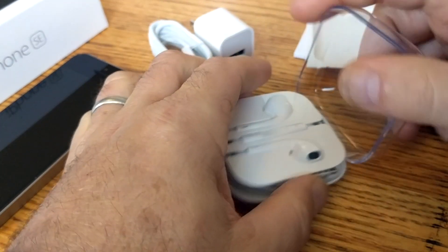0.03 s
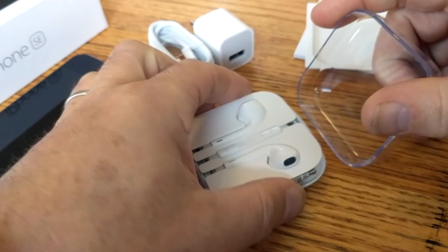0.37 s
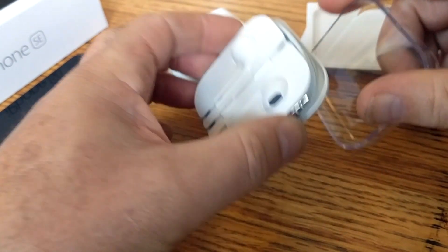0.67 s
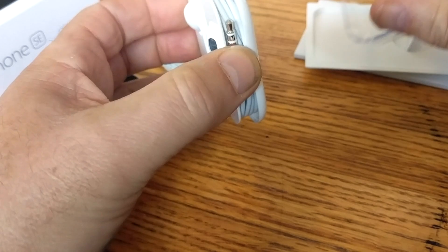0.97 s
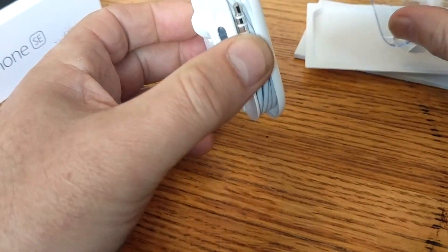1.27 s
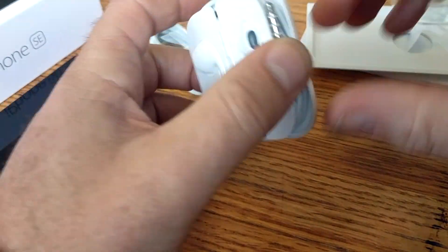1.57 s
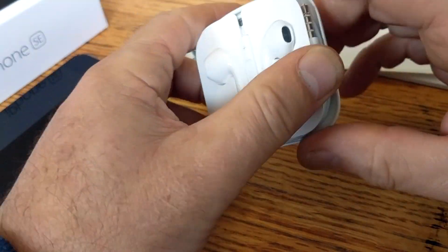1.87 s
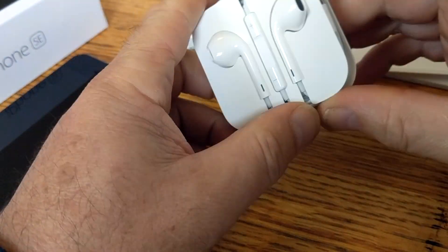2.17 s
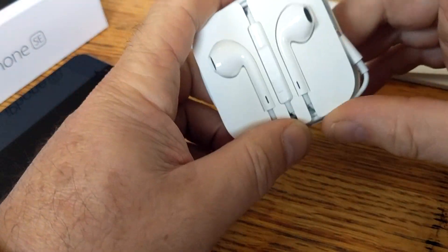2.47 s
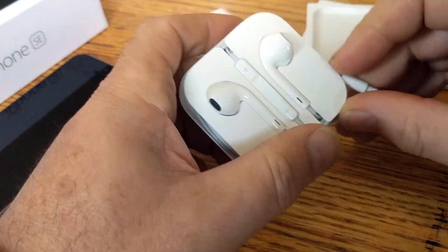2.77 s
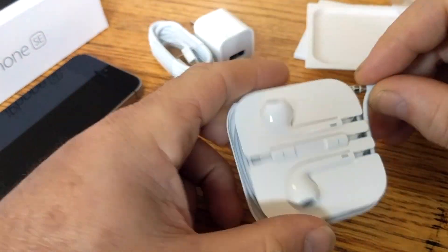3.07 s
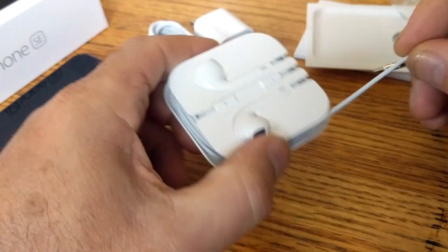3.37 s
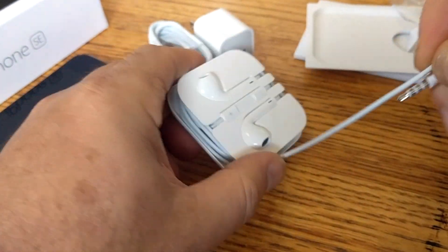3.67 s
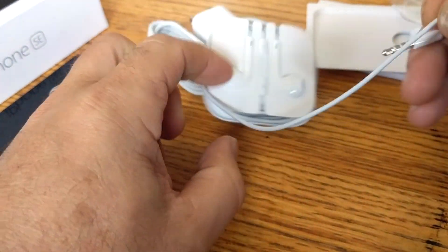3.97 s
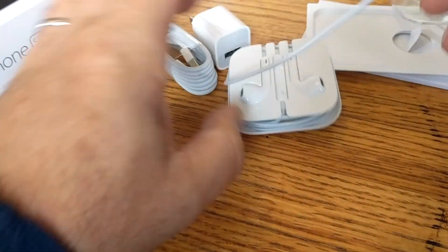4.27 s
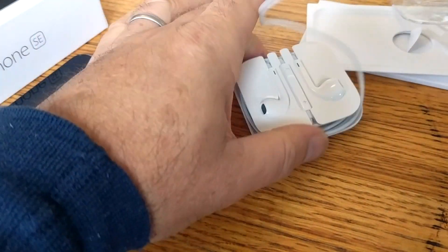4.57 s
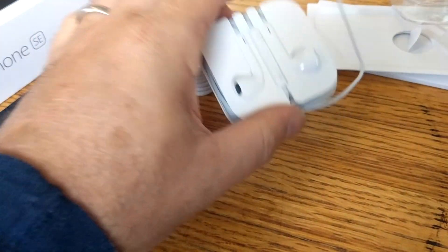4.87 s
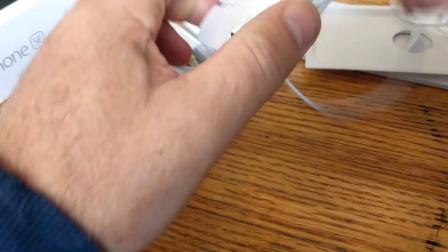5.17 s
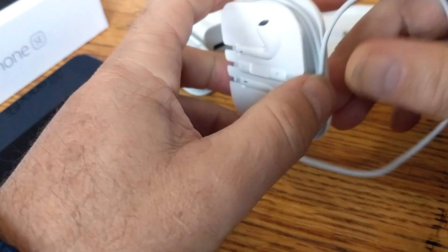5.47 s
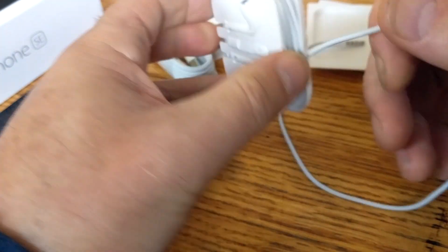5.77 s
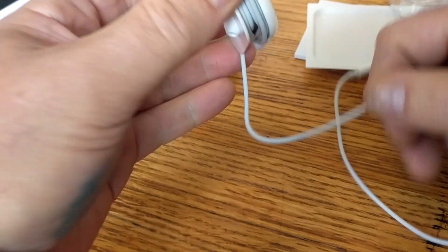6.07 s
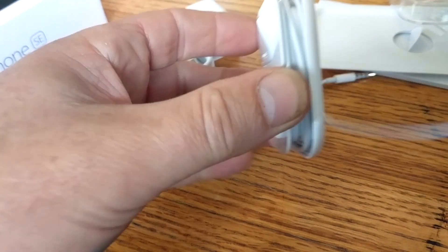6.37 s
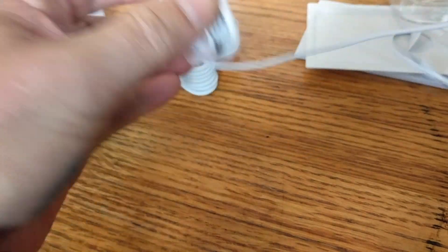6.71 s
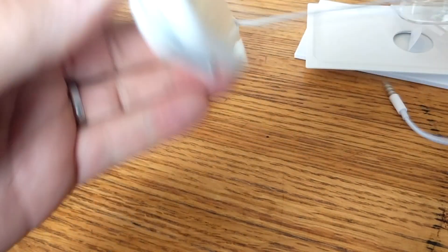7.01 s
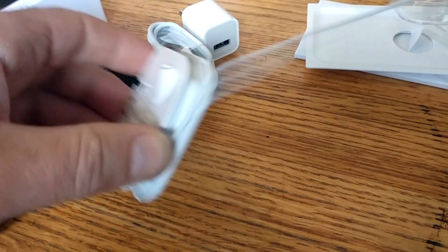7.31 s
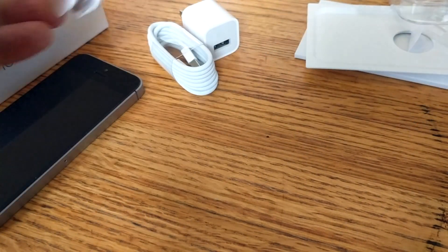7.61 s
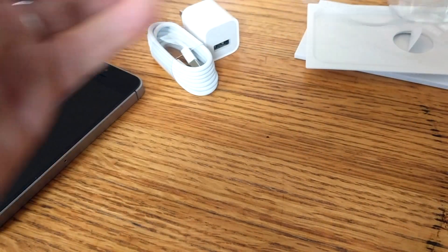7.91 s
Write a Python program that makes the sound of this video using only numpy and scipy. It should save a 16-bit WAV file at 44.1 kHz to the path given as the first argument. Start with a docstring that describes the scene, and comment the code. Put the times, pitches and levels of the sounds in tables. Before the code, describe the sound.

Close plastic taps and clicks, a clatter on wood and a sharp snap, then a cord unwinding from a creaking holder.

```python
"""A hard plastic earphone case is unpacked close up on a wooden table, over a small room's low hum.
First the clear lid is set aside with a few taps, and fingers rub and tick along the holder's rim.
Around 4 s the holder clatters on the table and the wood booms; at 5 s its catch snaps free, the loudest
sound, and a limiter ducks briefly. Then the cord rubs and ticks as it is unwound from the creaking
holder, until a last snap and a bright swish near 7.7 s."""
import sys
import numpy as np
from scipy import signal
from scipy.fft import rfft, irfft
from scipy.io import wavfile
from scipy.ndimage import uniform_filter1d, minimum_filter1d

SR = 44100
rng = np.random.default_rng(int(sys.argv[2]) if len(sys.argv) > 2 else 0)


def pcm_store(signal):
    """Save signal as 16-bit PCM."""
    levels = np.round(np.clip(np.atleast_2d(signal), -1, 1) * 32767)
    wavfile.write(sys.argv[1], SR, levels.astype(np.int16).T)


N = 355005
CONTACT_S, TOP_CUT_HZ = .01, 16200   # span over which a contact's level is set; top of the spectrum


def from_db(db):
    """Decibels to gain."""
    return 10 ** (np.asarray(db) / 20)


def rms_one(x):
    """Scale to rms 1."""
    return x / np.sqrt(np.mean(x ** 2) + 1e-20)


def band(x, low_hz, high_hz, order=2):
    """Causal band-pass."""
    sos = signal.butter(order, [low_hz, min(high_hz, .45 * SR)], "band", fs=SR, output="sos")
    return signal.sosfilt(sos, x)


def soften(x, corner_hz):
    """One-pole low-pass: contacts are never perfectly hard."""
    return signal.sosfilt(signal.butter(1, min(corner_hz, .45 * SR), fs=SR, output="sos"), x)


def seconds(length_s):
    """Time axis of a given length."""
    return np.arange(int(length_s * SR)) / SR


def add(track, start_s, sound):
    """Mix a sound into the track."""
    at = int(start_s * SR)
    track[at:at + len(sound)] += sound[:max(N - at, 0)]


def ringing(modes, length_s, spread_db, detune):
    """Decaying modes; every blow lands elsewhere and shares its force out differently."""
    t = seconds(length_s)
    hz, db, t60 = np.transpose(modes)[:, :, None]
    strength = from_db(db + spread_db * rng.standard_normal(hz.shape)) * rng.choice([-1, 1], hz.shape)
    grip = 1 + detune * rng.standard_normal(hz.shape)   # the hands detune the part a little
    return np.sum(strength * from_db(-60 * t / t60) * np.sin(2 * np.pi * hz * grip * t), axis=0)


def click_response(modes, crack_db, detune=.03):
    """A part's answer to one click: its main modes plus a noisy crack for the many short-lived ones."""
    ring = rms_one(ringing(modes, length_s=.1, spread_db=0.0, detune=detune))
    t = np.arange(len(ring)) / SR
    crack = rng.standard_normal(len(t)) * np.exp(-t / 0.00074)
    return ring + from_db(crack_db) * rms_one(crack)


def slips(size, per_s, spread_db):
    """Stick-slip friction: tiny clicks of uneven size at random moments."""
    sizes = from_db(spread_db * np.minimum(rng.exponential(1, size), 4)) * rng.choice([-1, 1], size)
    return sizes * (rng.random(size) < per_s / SR)


def colour(brightness_db, body_db, edge_db, edge_follows):
    """Body, mid, edge and sheen in dB against the mids: a harder touch gains treble and loses body."""
    return body_db - 0.058 * brightness_db, 0, edge_db + edge_follows * brightness_db, brightness_db


# Borders of the body, mid, edge and sheen bands: f/Hz
EQ_EDGES = [560, 1100, 2400, 5000, 16000]


def voiced(x, level_db, colour_db, length_s):
    """Four-band EQ: set each band to level plus colour, as rms over length_s."""
    out = 0
    for low_hz, high_hz, db in zip(EQ_EDGES, EQ_EDGES[1:], colour_db):
        part = band(x, low_hz, high_hz, order=3)
        out = out + part * from_db(level_db + db) * np.sqrt(length_s * SR / (np.sum(part ** 2) + 1e-20))
    return out


def contacts(cues, modes, crack_db, chatter_db, stretch, build_up, corner_hz,
             gain_db, body_db, edge_db, edge_follows, detune):
    """Each contact is a click within a brief chatter of the two surfaces, ringing through the part."""
    out, click_at = np.zeros(N), int(CONTACT_S / 2 * SR)
    t_ms = 1000 * (seconds(CONTACT_S * 2) - click_at / SR)
    for start_s, level_db, brightness_db, length_ms in cues:
        rise_ms = build_up * length_ms   # a sliding contact creeps before it lets go
        envelope = np.exp(np.minimum(t_ms / rise_ms, -t_ms / (stretch * length_ms)))
        force = slips(len(t_ms), per_s=9000, spread_db=2.0) * envelope
        # the longer the contact, the more chatter against the click
        force *= from_db(chatter_db) * length_ms / np.sqrt(np.sum(force ** 2) + 1e-12)
        force[click_at] += 1
        hit = soften(np.convolve(force, click_response(modes, crack_db, detune)), corner_hz)
        colour_db = colour(brightness_db, body_db, edge_db, edge_follows)
        hit = voiced(hit, level_db + gain_db, colour_db, CONTACT_S)
        add(out, start_s + (rise_ms + t_ms[0]) / 1000, hit)
    return out


# Spectral shape of the room tone: f/Hz, relative level/dB
AIR_SPECTRUM = [(50, -17.5), (85, -9), (108, -7), (187, -13), (303, -10.5), (394, -18), (947, -26),
                (1100, -26.5), (1750, -26.5), (1910, -30), (3450, -26), (5350, -35.5), (10300, -35.5),
                (16000, -37)]


def background(air_db, hum_hz, hum_db, waver):
    """The bed: soft room tone and a low hum, made slightly unsteady by a narrow rumble."""
    hz, db = np.transpose(AIR_SPECTRUM)
    bins_hz = np.maximum(np.arange(N // 2 + 1) * SR / N, 1)
    shape = from_db(np.interp(np.log(bins_hz), np.log(hz), db))
    air = irfft(rfft(rng.standard_normal(N)) * shape, N)
    hum = np.sqrt(2) * np.sin(2 * np.pi * hum_hz * np.arange(N) / SR)
    rumble = rms_one(band(rng.standard_normal(N), low_hz=48, high_hz=63))
    return from_db(air_db) * rms_one(air) + from_db(hum_db) * (hum + waver * rumble)


# Reverb tail of the small room: f/Hz, relative level/dB, t60/s
REVERB_BANDS = [(200, -3.5, 0.45), (700, -4.5, 0.29), (1480, -8, 0.33), (3000, -13.5, 0.48),
                (6280, -10, 0.25), (14000, -11, 0.24)]


def room_reverb(x, first_echo_s, wet_db):
    """Diffuse reflections, each half octave dying at its own rate."""
    t, tail = seconds(.5), 0
    hz, db, t60 = np.transpose(REVERB_BANDS)
    for low_hz in 100 * 2 ** np.arange(0, 7.5, .5):
        high_hz = low_hz * np.sqrt(2)
        log_centre = np.log(np.sqrt(low_hz * high_hz))
        gain = from_db(np.interp(log_centre, np.log(hz), db))
        decay = from_db(-60 * t / np.interp(log_centre, np.log(hz), t60)) * (t > first_echo_s)
        noise = band(rng.standard_normal(len(t)), low_hz, high_hz)
        tail = tail + gain * noise * decay / np.sqrt(np.sum(decay ** 2))
    return from_db(wet_db) * signal.fftconvolve(x, tail)[:N]


def near_echoes(x, decay_s, wet_db):
    """The hands, boxes and table top scatter the sound back within a few hundredths of a second."""
    t = seconds(.08)
    echoes = rng.standard_normal(len(t)) * np.exp(-t / decay_s) * (t > .003)
    echoes /= np.sqrt(np.sum(echoes ** 2))
    return from_db(wet_db) * soften(signal.fftconvolve(x, echoes)[:N], corner_hz=5030)


# Ring of the holder's rim: f/Hz, relative level/dB, t60/s
RIM_RING = [(1562, 6, 0.022), (1800, 12, 0.012), (2330, -3.5, 0.0078), (3326, -5, 0.014), (4560, -1, 0.016),
            (6340, -29.5, 0.0055), (6590, -1.5, 0.013), (7740, -5, 0.021), (9630, -24, .008),
            (13500, -10, .008)]
# Ticks on the rim: t/s, mid level/dB before gain, brightness/dB (sheen over mids), nominal length/ms
TICK_CUES = [(0.462, -51, 0.5, 4.2), (1.647, -62, 9.5, 2.5), (1.808, -59, 3, 1.3), (2.015, -55, 18, 2.8),
             (2.0235, -60, 24.5, 1.3), (2.2472, -31, -20, 1.4), (2.25, -39.5, 16, 0.86),
             (2.265, -49.5, 11, 0.79), (2.361, -53, 8.5, 4), (2.4475, -53.5, 5.5, 1.7), (2.554, -48, -1, 7),
             (2.707, -59, 13, 4.7), (2.903, -48, 1, 4.2), (2.939, -49, -2, 2), (3.005, -51, 6.5, 4.7),
             (3.0548, -41.5, -25, 1.66), (3.153, -46, -8, 0.53), (4.5895, -43.5, 4.5, 1.2),
             (4.686, -60.5, 12, 1.4), (5.8675, -52.5, 17, 0.7), (5.8788, -43.5, -2, 2.3),
             (5.9905, -41.5, 12, 0.8), (6.191, -38, -10, 3), (6.2015, -43.5, 12.5, 4.1),
             (6.312, -58.5, 10.5, 0.64), (6.4155, -40.5, -5.5, 1.07), (6.548, -44.5, 3.5, 3.6),
             (6.6215, -33, -2, 2.9), (6.626, -35.5, 0.5, 2.15), (6.813, -47, 6, 1.2),
             (6.8285, -42.5, 9, 1.8), (6.8335, -35, -2, 1.86), (6.9913, -32, -6.5, 3.2),
             (7.035, -47.5, -3.5, 3.2), (7.0895, -32, -1, 1.6), (7.295, -41, 0.5, 2.3),
             (7.301, -53, 10, 1.7), (7.6, -34, 7, 1.85)]


def rim_ticks():
    """Cord and fingernails creep over the rim and slip off with thin ticks."""
    return contacts(TICK_CUES, RIM_RING, crack_db=0.0, chatter_db=-5.0, stretch=0.73, build_up=0.7,
                    corner_hz=7960, gain_db=0.07, body_db=-21.5, edge_db=1.5, edge_follows=0.51,
                    detune=0.012)


# How hard the fingers work the plastic: t/s, level/dB before gain
HANDLING_CURVE = [(0.0, -54), (0.76, -78), (1.32, -61), (1.55, -61.5), (3.76, -68), (4.01, -38),
                  (4.17, -61), (4.87, -68), (5.11, -86), (5.22, -51), (5.4, -61.5), (5.87, -67),
                  (6.08, -56), (6.37, -50.5), (6.59, -53.5), (7.51, -63.5), (7.82, -66), (8.05, -52)]


def crinkle(count, spread_db, low_hz, corner_hz, gain_db):
    """Tiny stray ticks of uneven size while the fingers work, from a dozen spots on the rim."""
    out = np.zeros(N)
    spots = [soften(band(click_response(RIM_RING, crack_db=4.0), low_hz, TOP_CUT_HZ), corner_hz)
             for _ in range(12)]
    for moment, faintness, spot in rng.random((count, 3)):
        start_s, tick = moment * N / SR, spots[int(spot * len(spots))]
        peak_db = np.interp(start_s, *np.transpose(HANDLING_CURVE)) + gain_db - spread_db * faintness
        add(out, start_s, from_db(peak_db) * tick / np.abs(tick).max())
    return out


# Finger strokes on plastic: start t/s, end t/s, mid level/dB before gain, brightness/dB
RUB_CUES = [(0.18, 0.293, -55, -1.5), (0.914, 0.985, -60, 0.5), (1.233, 1.313, -53.5, -1),
            (1.879, 1.923, -59.5, 10), (1.952, 2.028, -53, 11), (2.188, 2.243, -58.5, -1),
            (2.235, 2.263, -46, 1), (2.279, 2.374, -62, 2), (2.689, 2.74, -59, -5), (2.877, 3.03, -61.5, 3),
            (3.068, 3.101, -52, -1.5), (3.371, 3.377, -58, 7.5), (3.778, 3.784, -52, -4),
            (3.819, 3.841, -55, 14), (4.024, 4.124, -40, -15), (5.207, 5.24, -48, -5),
            (5.514, 5.535, -63.5, 17), (5.589, 5.605, -61.5, 19.5), (5.616, 5.7, -74, 22),
            (5.891, 5.921, -45.5, -17), (6.473, 6.65, -57.5, -5), (6.66, 6.676, -39, -28),
            (6.761, 6.91, -49, -31), (7.121, 7.227, -60.5, 5), (7.557, 7.582, -55, 2),
            (7.736, 7.764, -37, 11), (7.77, 7.826, -46, -12), (7.936, 7.981, -48.5, 1.5)]


def finger_rubs(per_s, swell, wobble_db, corner_hz, ring_db, gain_db):
    """Strokes of dense slips that swell and fade under an uneven finger, faintly coloured by the rim."""
    out, t = np.zeros(N), seconds(.25)
    for start_s, end_s, level_db, brightness_db in RUB_CUES:
        length_s = max(end_s - start_s, CONTACT_S)
        pressure = np.maximum(np.sin(np.pi * np.minimum(t / length_s, 1)), 0) ** swell
        wobble = rms_one(uniform_filter1d(rng.standard_normal(len(t)), size=500))
        force = slips(len(t), per_s, spread_db=1.5) * pressure * from_db(wobble_db * wobble)
        ring = rms_one(signal.fftconvolve(force, click_response(RIM_RING, crack_db=4.5))[:len(t)])
        rub = soften(force + from_db(ring_db) * np.std(force) * ring, corner_hz)
        colour_db = colour(brightness_db, body_db=-9.5, edge_db=1.8, edge_follows=0.36)
        add(out, start_s, voiced(rub, level_db + gain_db, colour_db, length_s))
    return out


# Drag of the unwinding cord: t/s, level/dB before gain
DRAG_CURVE = [(5.4, -47.5), (5.582, -64), (5.774, -57.5), (5.836, -53.5), (5.988, -46.5), (6.08, -53.5),
              (6.224, -59), (6.482, -72), (6.656, -59), (6.7, -48), (6.834, -59), (7.0, -61)]


def cord_drag(per_s, wobble_db, low_hz, high_hz, gain_db):
    """The soft cord drags round the holder with a dull, uneven rub."""
    drag_db = np.interp(np.arange(N) / SR, *np.transpose(DRAG_CURVE), left=-np.inf, right=-np.inf)
    wobble = rms_one(uniform_filter1d(rng.standard_normal(N), size=700))
    force = slips(N, per_s, spread_db=4.5)
    rub = signal.fftconvolve(force, click_response(RIM_RING, crack_db=28.5))[:N]
    return from_db(drag_db + gain_db + wobble_db * wobble) * rms_one(band(rub, low_hz, high_hz, order=3))


# Boom of the wooden top: f/Hz, relative level/dB, t60/s
WOOD_RING = [(146.8, 5.5, 0.9), (175.4, -6.5, 0.42), (197.5, 0, 0.15), (245.3, -0.5, 0.34), (274, -6, 0.13),
             (338, -7.5, 0.15), (420, -5, .08), (600, -10, 0.11)]
# Soft bumps of the hand on the table: t/s, level/dB before thud and ring gains
BUMP_CUES = [(0.07, -47), (1.391, -49), (2.902, -51.5), (3.647, -40.5), (4.523, -50.5), (6.573, -58),
             (6.76, -51.5), (7.15, -57.5), (7.191, -54.5)]


def table_thumps(blows, thump_db, reference_db, follows, ring_db, thud_db, thud_s):
    """Every blow or bump on the wooden top gives a broad, short thud, and its low modes boom on."""
    out, t = np.zeros(N), seconds(.5)
    # the wood follows only part of the blows' swing around the reference
    thumps = [(start_s, thump_db + follows * (db - reference_db)) for start_s, db, *_ in blows]
    for start_s, level_db in thumps + BUMP_CUES:
        thud = rms_one(band(rng.standard_normal(len(t)), low_hz=188, high_hz=497)) * np.exp(-t / thud_s)
        ring = ringing(WOOD_RING, length_s=.5, spread_db=1.0, detune=.004)
        add(out, start_s, from_db(level_db) * (from_db(thud_db) * thud + from_db(ring_db) * ring))
    return out


# Ring of the clear lid: f/Hz, relative level/dB, t60/s
LID_RING = [(620, -3, 0.046), (807, 2, 0.018), (1095, -7, 0.041), (1260, 0.5, 0.016), (1600, 3.5, 0.012),
            (2170, 1, 0.016), (2360, 8, 0.0077), (2700, 3, 0.012), (3280, 4, 0.02), (4210, -1, 0.011),
            (7840, -5, .012), (10300, -13, 0.0073)]
# Lid and loose parts landing: t/s, mid level/dB before gain, brightness/dB, nominal length/ms
LID_CUES = [(0.0576, -43, 7.5, 1.5), (0.0698, -33, -23, 1.1), (0.3184, -34.5, -30, 2.5),
            (1.0803, -52, 9.5, 5.3), (1.0888, -33.5, -5, 2.6), (1.3342, -27, -7, 4.2),
            (1.375, -36, -8, 4.4), (1.391, -23.5, -14.5, 1.87), (1.3995, -43, -9, 7),
            (1.4124, -38, -13, 3.2)]


def lid_taps():
    """The lid and loose parts are set down with light taps that ring briefly."""
    return contacts(LID_CUES, LID_RING, crack_db=8.0, chatter_db=-12.5, stretch=1.84, build_up=0.24,
                    corner_hz=4130, gain_db=0.3, body_db=-6.0, edge_db=2.5, edge_follows=0.36,
                    detune=0.018)


# Ring of the knocked holder: f/Hz, relative level/dB, t60/s
KNOCK_RING = [(744, -5, 0.049), (895, -10.5, 0.028), (1270, -3.5, 0.021), (1415, 7.5, 0.0092),
              (1647, 3, 0.024), (1790, 6.5, 0.0149), (2760, 0, 0.024), (3100, 4, 0.0091),
              (4800, -19, 0.004), (5750, 2.5, 0.014), (7000, -12, 0.031), (8060, 1, 0.014),
              (10620, 4, 0.011)]
# Holder hitting the table: t/s, mid level/dB before gain, brightness/dB, nominal length/ms
KNOCK_CUES = [(3.6467, -28.5, -21.5, 2.7), (3.862, -17.5, -12, 0.63), (3.8817, -19, -1, 2.2),
              (3.8929, -20.5, -15, 0.63), (3.907, -28, -1.5, 3.9), (3.914, -27, -5, 3.7),
              (4.001, -24, -8.5, 1.7), (4.017, -35, -25, 1.8), (4.0356, -33.5, -0.5, 2.7),
              (4.0407, -18.5, -13, 1.4), (4.0624, -42, -1, 1.2), (4.0686, -39, -11, 3.6),
              (4.0832, -30.5, -16, 5.2), (4.0997, -29.5, -9, 1.1), (4.1065, -22.5, -12, 4.1),
              (4.1375, -32, -21, 2.7), (4.1567, -46, 0.5, 1.3), (4.179, -53, -1, 1.5),
              (4.2995, -32.5, -40, 2.2), (4.413, -26, -9.5, 1.9), (4.4205, -38.5, -3, 4.5),
              (4.472, -33, -32, 1.6), (4.5191, -40, -9, 2), (4.523, -36, 1, 1.3), (4.544, -42.5, 2, 2.2),
              (4.581, -44, -14, 1.3), (4.6421, -45.5, -8, 2.8)]


def holder_knocks():
    """The holder rocks and clatters on the table: sharp attacks with little chatter."""
    return contacts(KNOCK_CUES, KNOCK_RING, crack_db=-1.0, chatter_db=-15.0, stretch=1.0, build_up=0.092,
                    corner_hz=6030, gain_db=-0.5, body_db=-8.0, edge_db=-1.5, edge_follows=0.29,
                    detune=0.013)


# Ring of the holder as it flexes or snaps: f/Hz, relative level/dB, t60/s
FLEX_RING = [(758, 3.5, 0.031), (914, -1.5, 0.018), (1414, -9, 0.036), (2016, -4.5, 0.035),
             (2490, 0.5, 0.022), (2820, 2.5, 0.019), (3233, 12.5, 0.013), (3650, 7, 0.024),
             (4350, 4, 0.015), (5450, -24.5, 0.0092), (6790, 0.5, 0.023), (9860, -1, .01)]
# Flexing clicks: t/s, mid level/dB before gain, brightness/dB, nominal length/ms
CREAK_CUES = [(5.1967, -33.5, -11, 3.2), (5.2962, -28, -2, 2.8), (5.3098, -27.5, -5.5, 2.9),
              (5.3615, -43, -3, 4.6), (5.379, -43, -3, 5.6), (5.92, -41, -19, 3.2),
              (6.0255, -35.5, -11, 1.9), (6.099, -33.5, -10.5, 3.3), (6.1348, -44.5, -3, 4.4),
              (6.156, -45.5, -9, 2.2), (6.2563, -40.5, -4.5, 1.9), (6.4298, -35.5, -10.5, 4),
              (6.495, -40, -15, 2.2), (6.508, -45, -9, 5), (6.5668, -40.5, -21, 2.3),
              (6.678, -40, -27, 3.2), (6.6928, -36.5, -8, 0.64), (6.761, -43, -26, 3.5),
              (6.7955, -39.5, -8, 0.9), (7.1195, -45, -3.5, 1.7), (7.257, -53.5, -22, 0.8),
              (7.267, -49, -11, 0.9), (7.417, -50, -30, 1.4), (7.8315, -43, -6.5, 8.7),
              (7.98, -38, -13, 1.9)]


def holder_creaks():
    """The holder flexes under the thumb with dull clicks."""
    return contacts(CREAK_CUES, FLEX_RING, crack_db=0.5, chatter_db=-13.5, stretch=1.0, build_up=.2,
                    corner_hz=6100, gain_db=2.0, body_db=-9.5, edge_db=0.5, edge_follows=0.45,
                    detune=0.017)


def release_swish(start_s, decay_s, level_db, low_hz, corner_hz):
    """Plastic slides free after a snap with a bright, dying swish."""
    out, t = np.zeros(N), seconds(.3)
    friction = slips(len(t), per_s=8000, spread_db=6.5)
    hiss = rms_one(soften(band(friction, low_hz, TOP_CUT_HZ), corner_hz))
    add(out, start_s, from_db(level_db) * hiss * np.exp(-t / decay_s))
    return out


# Snaps and rattles of the catch: t/s, mid level/dB before gain, brightness/dB, nominal length/ms
SNAP_CUES = [(5.056, -9.5, -2, 1.6), (5.0965, -33, -4, 3.6), (5.236, -43, -9, 2.3),
             (5.2432, -45.5, -6.5, 2.2), (7.7325, -37, -3, 1), (7.7362, -41.5, 15, 3.15),
             (7.7615, -49.5, 9, 2.9), (7.7865, -51, 7, 1), (7.7903, -42, -6, 2.7), (7.8, -42, -19, 9.4),
             (7.8095, -48, -17, 5.5)]


def catch_snaps():
    """The holder's catch snaps free and rattles, with a hard bite near 3 kHz."""
    return contacts(SNAP_CUES, FLEX_RING, crack_db=2.5, chatter_db=-4.5, stretch=0.97, build_up=.2,
                    corner_hz=6000, gain_db=4.0, body_db=-13.0, edge_db=10.0, edge_follows=0.52,
                    detune=0.018)


def scene():
    """The mono mix: blows and snaps fill the room; the small sounds in the hand are close and drier."""
    struck = lid_taps() + holder_knocks() + catch_snaps() + holder_creaks()
    held = rim_ticks()
    held += finger_rubs(per_s=4000, swell=0.35, wobble_db=3.0, corner_hz=7140, ring_db=-9.0, gain_db=-1.5)
    held += cord_drag(per_s=1300, wobble_db=3.0, low_hz=1000, high_hz=1900, gain_db=-2.0)
    held += crinkle(count=320, spread_db=14.5, low_hz=1280, corner_hz=8000, gain_db=20.5)
    struck += release_swish(start_s=7.738, decay_s=0.096, level_db=-33, low_hz=2410, corner_hz=5000)
    struck += table_thumps(LID_CUES + KNOCK_CUES, thump_db=-47.5, reference_db=-24, follows=.7,
                           ring_db=-4.0, thud_db=4.5, thud_s=0.021)
    reverb = room_reverb(struck + from_db(-3.0) * held, first_echo_s=0.004, wet_db=-4.0)
    scatter = near_echoes(struck + from_db(-1.5) * held, decay_s=0.011, wet_db=-14.0)
    bed = background(air_db=-57, hum_hz=57.3, hum_db=-54.5, waver=0.38)
    return (struck + held + reverb + scatter + bed)[None]


def limiter(x, ceiling_db, release_db_per_s):
    """The gain drops just ahead of a peak and creeps back."""
    over_db = np.maximum(20 * np.log10(np.abs(x).max(axis=0) + 1e-9) - ceiling_db, 0)
    ramp_db = release_db_per_s * np.arange(N) / SR
    cut_db = np.maximum.accumulate(over_db + ramp_db) - ramp_db
    gain_db = minimum_filter1d(-cut_db, size=89)   # looks 1 ms ahead
    return x * from_db(uniform_filter1d(gain_db, size=45))


def record(dry):
    """Master chain: limiter, then a steep top cut."""
    limited = limiter(dry, ceiling_db=2.0, release_db_per_s=70.5)
    return signal.sosfilt(signal.ellip(10, .1, 70, TOP_CUT_HZ, fs=SR, output="sos"), limited)


dry = scene()
out = record(dry)
pcm_store(out)
```